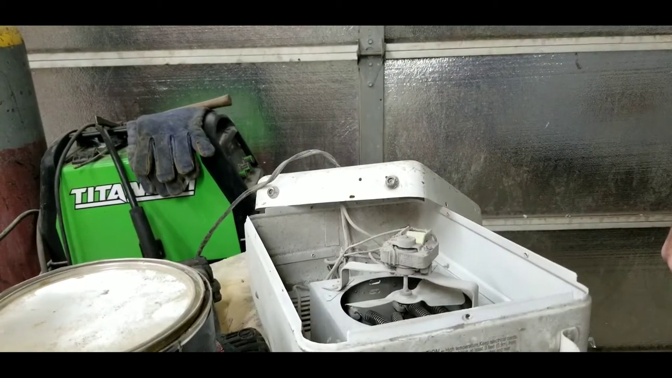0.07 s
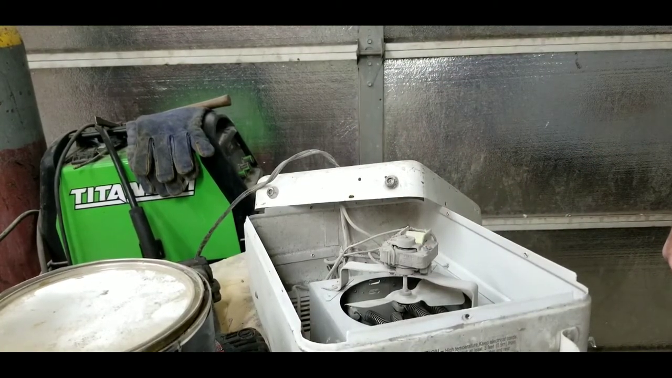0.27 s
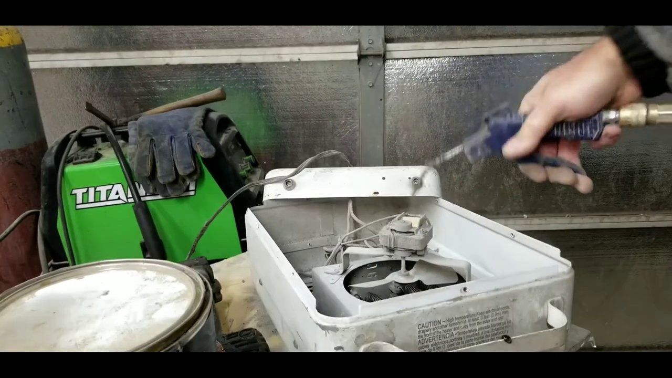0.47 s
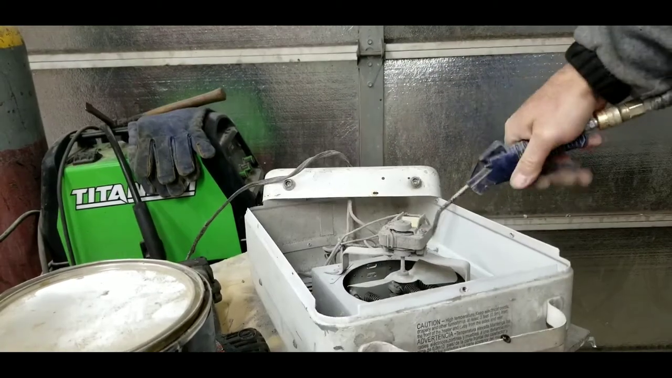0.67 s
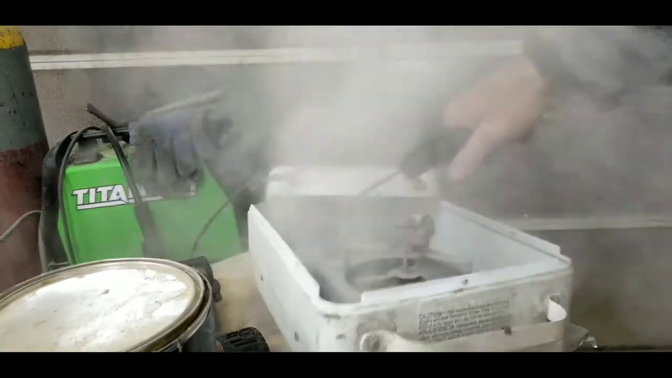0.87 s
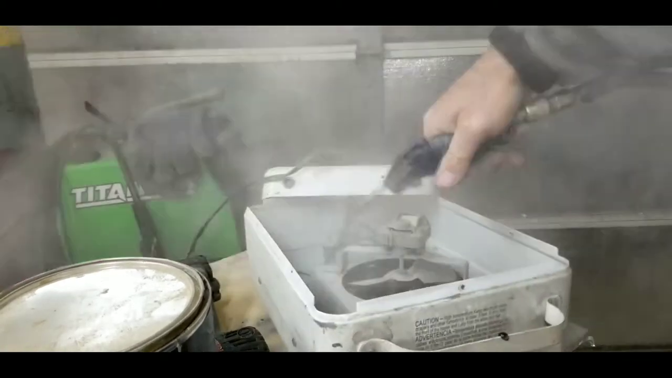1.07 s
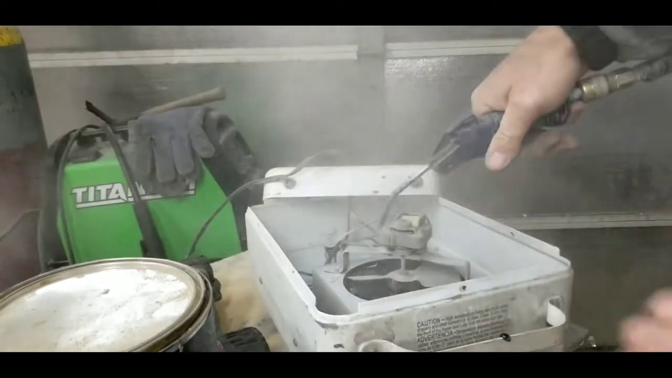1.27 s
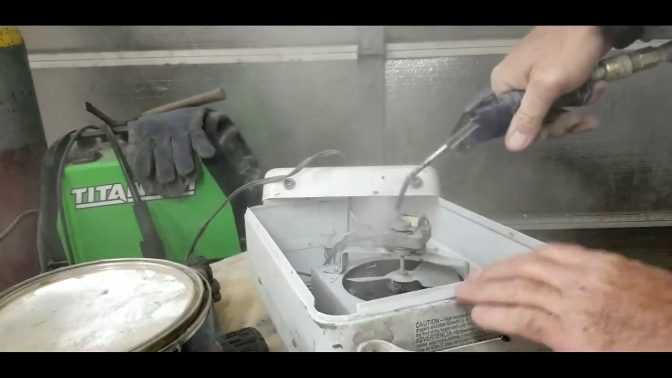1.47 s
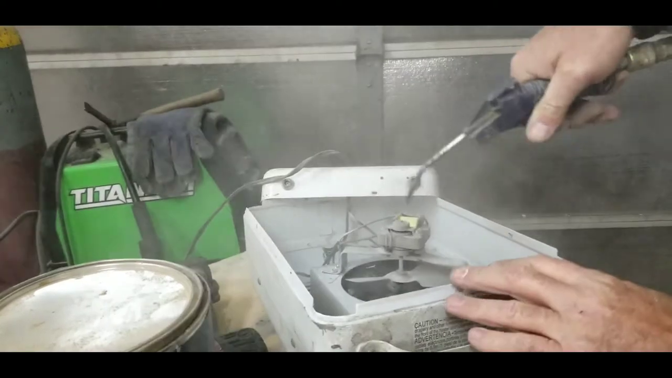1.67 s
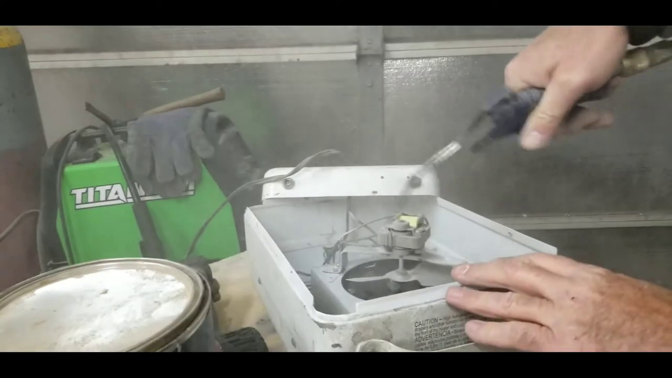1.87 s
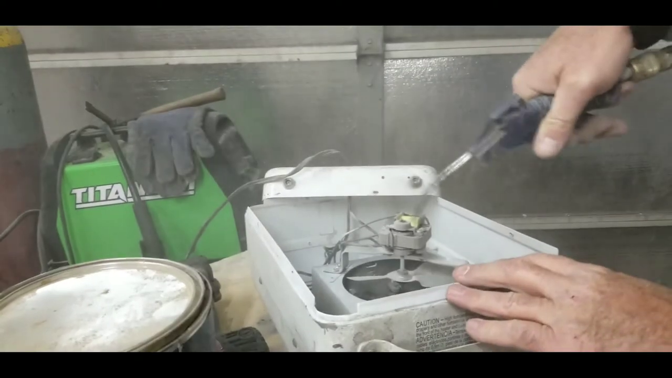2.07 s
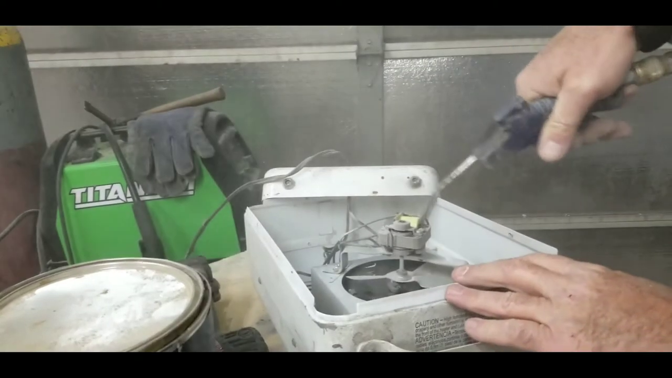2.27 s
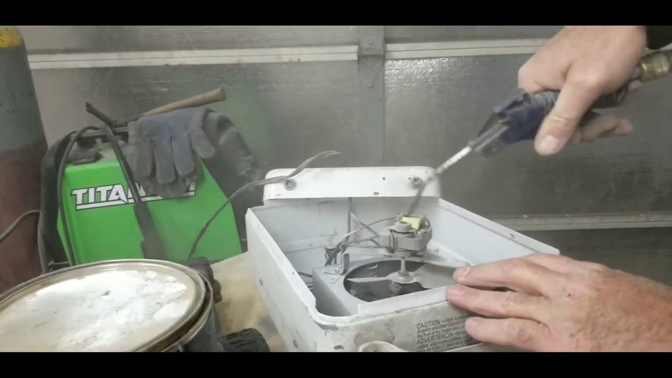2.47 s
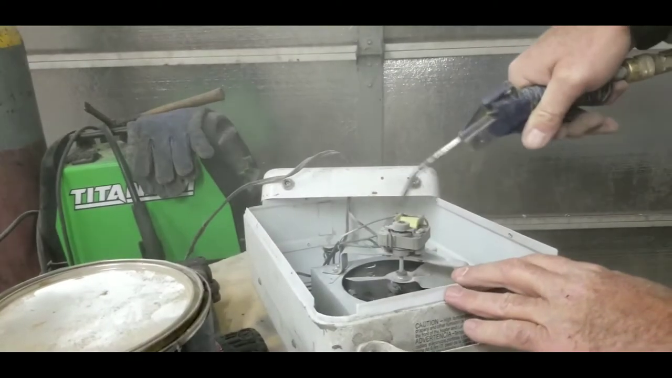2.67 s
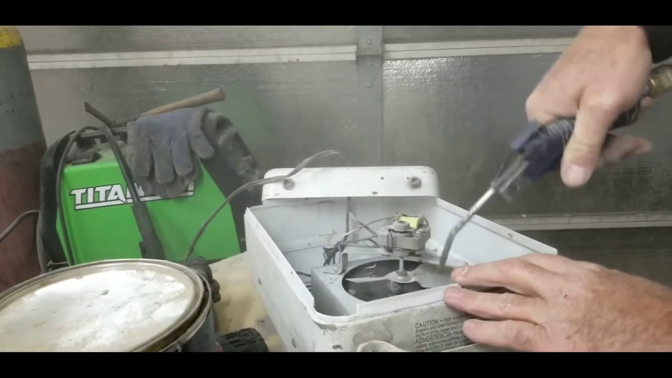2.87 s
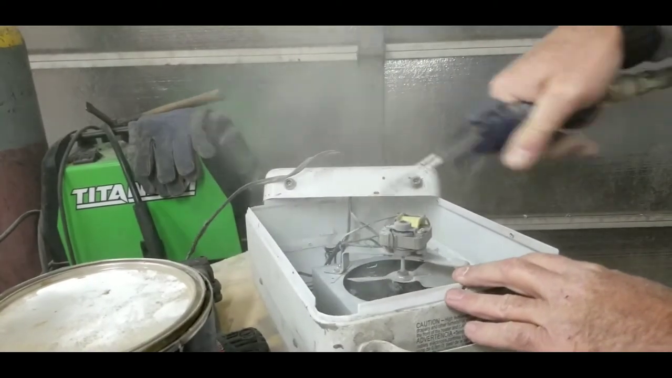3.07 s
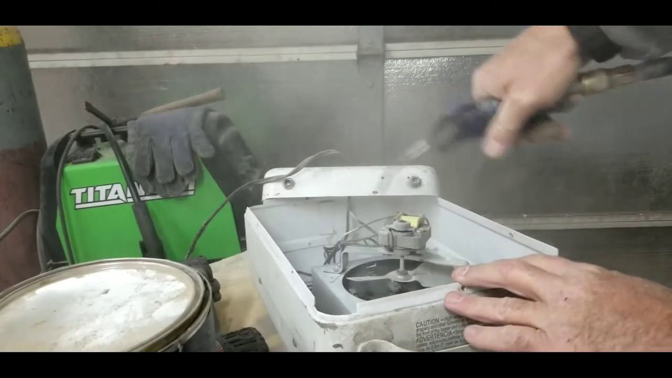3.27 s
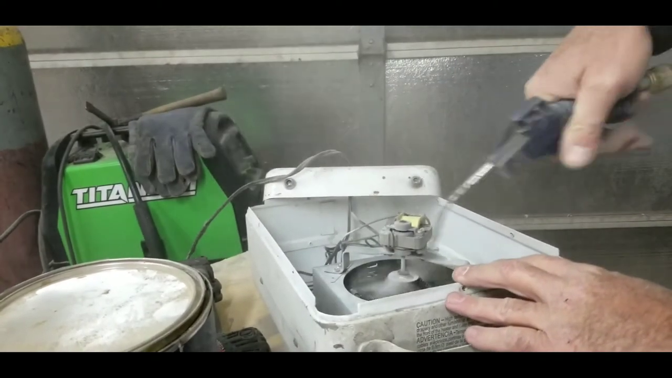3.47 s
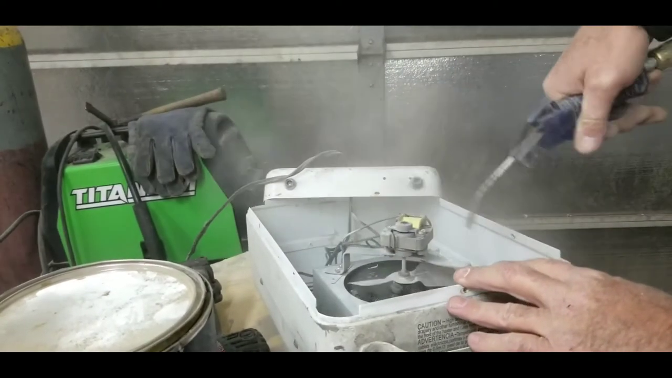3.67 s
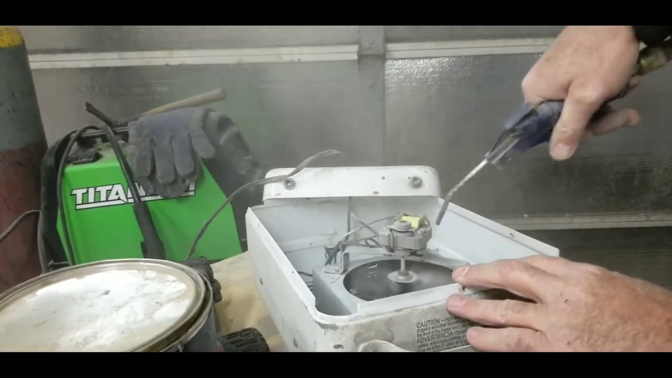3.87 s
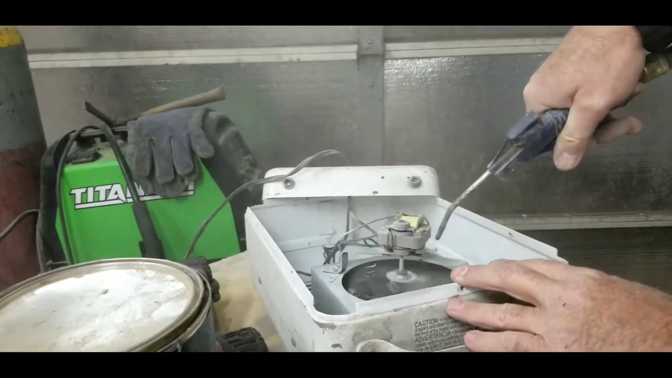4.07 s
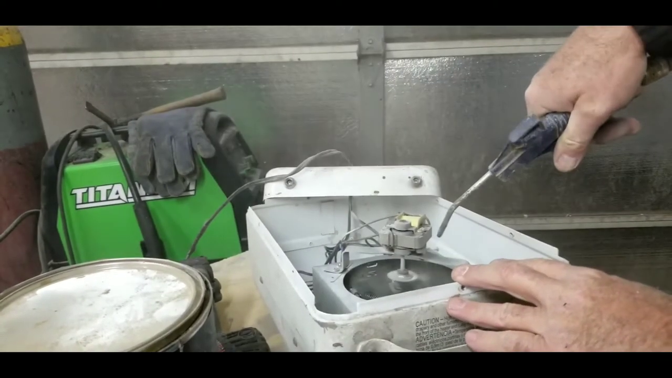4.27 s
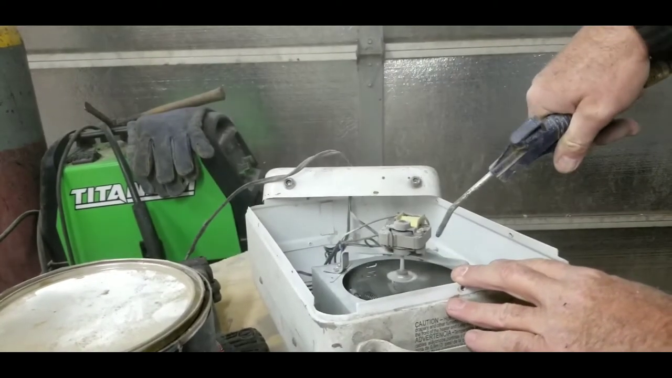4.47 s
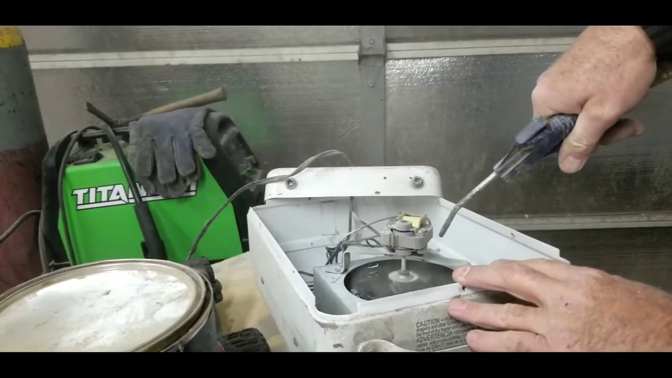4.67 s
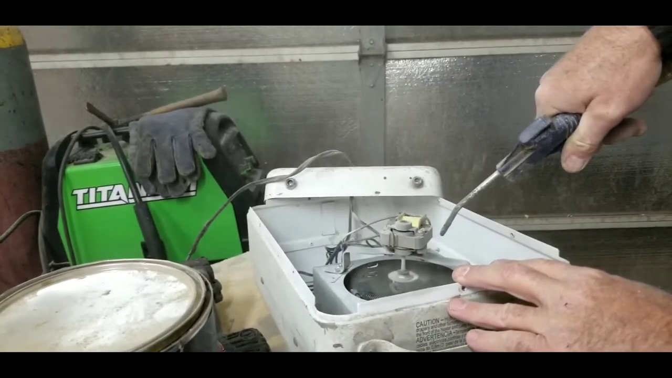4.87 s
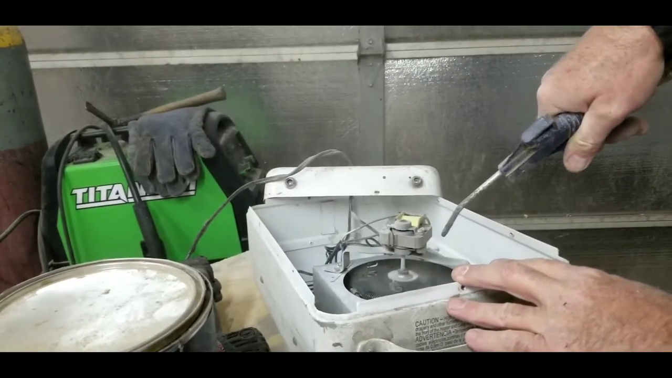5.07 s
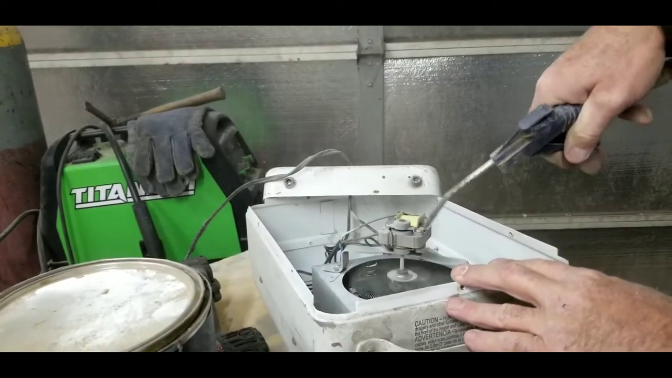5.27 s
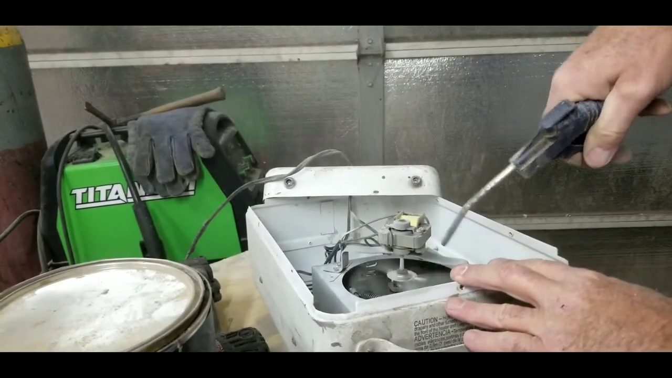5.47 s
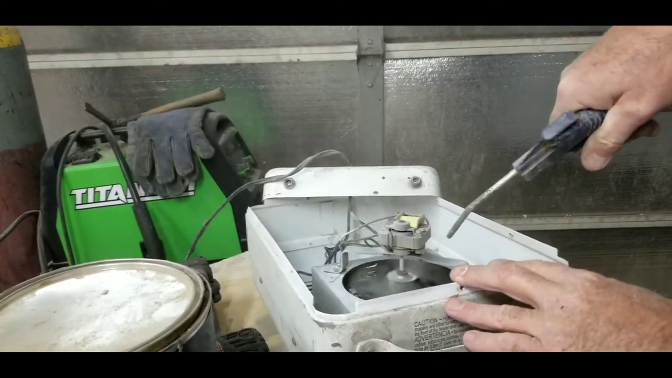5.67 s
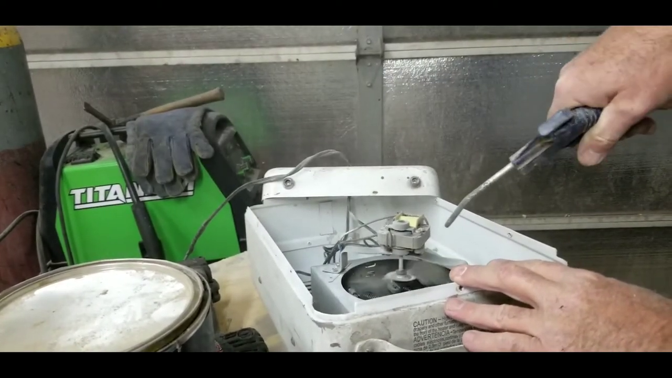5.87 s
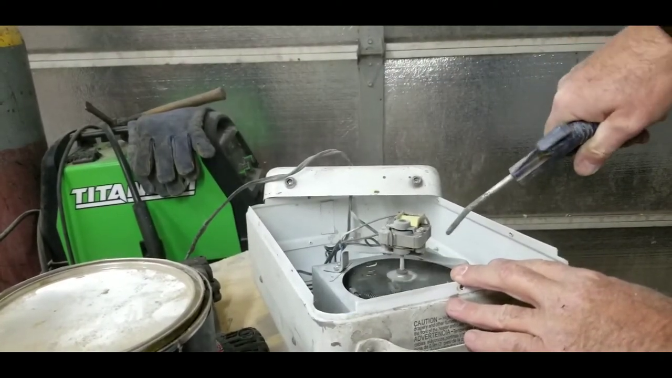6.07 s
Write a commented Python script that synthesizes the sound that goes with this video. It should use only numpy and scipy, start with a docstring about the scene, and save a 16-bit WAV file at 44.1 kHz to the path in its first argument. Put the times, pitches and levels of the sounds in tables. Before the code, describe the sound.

Close stereo microphones in a garage pick up a blow gun cleaning a metal fan heater. A soft rustle leads into a long blast of hissing air that shifts and roars hollowly as it sweeps the casing. Late in the blast the fan whines upward like a small siren. During a short pause the coasting fan chirps faintly; then the hiss returns and the whine climbs once more.

```python
"""In a garage, stereo microphones close to an open sheet-metal fan heater being cleaned with compressed air.
A low rumble, then sleeve and hose swish as the blow gun comes in. The first long burst opens with a whoomp;
the jet hisses, splashes off parts and roars in the casing, and the lance bumps the casing once. Near 4 s
the jet catches the fan, which spins up and chops the air like a siren. The air stops, the casing rings on
and the coasting fan's dry bearing chirps. At 5.5 s a second burst begins and soon catches the fan again."""
import sys
import numpy as np
from scipy import signal
from scipy.fft import rfft, irfft, next_fast_len
from scipy.io import wavfile
from scipy.ndimage import uniform_filter1d, map_coordinates

SR = 44100
rng = np.random.default_rng(int(sys.argv[2]) if len(sys.argv) > 2 else 0)


def unload_audio(sound):
    """Save the sound as a 16-bit wav file, at the path given as the first command line argument."""
    columns = np.transpose(np.atleast_2d(sound))
    # keep every value between -1 and 1, then stretch to whole-number steps
    steps = np.round(np.clip(columns, -1, 1) * 32767)
    wavfile.write(sys.argv[1], SR, steps.astype(np.int16))


N = 270333

# trigger held: opens t/s, closes t/s
BURSTS = [(0.666, 5.15), (5.494, 6.3)]
# slow drift of the aim between parts: t/s, hiss level/dB, splash level/dB, roar level/dB
AIM_DRIFT = [(0.7, -40, -52, -64), (1.15, -48, -55.5, -69), (1.65, -47, -60.5, -74), (2.3, -46.5, -61, -71),
             (2.9, -42.5, -52.5, -64.5), (3.15, -43, -51.5, -54.5), (3.62, -43.5, -48.5, -63.5),
             (3.8, -42.5, -55, -66), (4.0, -40.5, -48.5, -57), (4.55, -40.5, -46, -53),
             (5.14, -39.5, -48, -58.5), (5.5, -38.5, -52, -61.5), (5.75, -38, -55, -58.5),
             (5.96, -43, -53, -57), (6.1, -40.5, -52, -57)]
# the jet sweeps over a part: start t/s, length/s, hiss level/dB, splash level/dB, roar level/dB
SWEEPS = [(0.668, 0.15, -42, -45, -57), (0.753, 0.054, -44, -44.5, -53.5), (0.855, 0.16, -40, -43.5, -52),
          (1.082, 0.075, -45, -45.5, -52.5), (1.243, 0.15, -45, -43, -63), (1.404, 0.076, -50, -48, -58.5),
          (1.516, 0.021, -45, -49, -60), (1.544, 0.044, -48, -51.5, -59.5),
          (1.632, 0.06, -42.5, -53.5, -57.5), (1.735, .07, -46.5, -57.5, -70),
          (1.766, 0.023, -46, -43.5, -50.5), (1.875, 0.03, -43, -39, -50.5),
          (1.985, 0.044, -44, -39.5, -50), (2.095, 0.036, -41.5, -38.5, -52.5),
          (2.206, 0.039, -43.5, -39.5, -52), (2.307, 0.056, -53, -48.5, -52.5),
          (2.404, 0.073, -38.5, -46, -60.5), (2.49, 0.089, -44.5, -57, -59.5),
          (2.625, 0.038, -48, -35.5, -48), (2.706, 0.014, -43, -62, -57), (2.752, 0.027, -41, -44.5, -48.5),
          (2.803, 0.097, -42, -46.5, -63), (2.933, 0.14, -50, -45, -59), (3.176, 0.068, -60, -42.5, -50),
          (3.3, .07, -44.5, -48.5, -58), (3.393, 0.068, -49, -44, -52), (3.463, 0.065, -45, -47, -57.5),
          (3.685, 0.074, -40, -44, -56), (3.834, .105, -41.5, -44, -56.5), (5.505, .13, -52, -45, -64),
          (5.789, 0.038, -51, -59, -54), (5.839, 0.067, -42, -45.5, -51.5), (5.98, 0.14, -44.5, -44, -51)]
# resonance of the hollow that the jet blows into: t/s, f/Hz
HOLLOW_RESONANCE = [(1.15, 3470), (1.42, 4800), (1.75, 3620), (2.1, 4930), (2.25, 3550), (2.45, 5130),
                    (2.65, 3360), (2.9, 5670), (3.1, 3060), (3.45, 3850), (3.75, 5000), (6.1, 4500)]
# colours of the air at the nozzle, on surfaces and in the casing: f/Hz, relative level/dB
HISS_COLOUR = [(100, -69), (300, -18), (1000, -17), (2000, -13.5), (4000, -9), (7000, -0.5), (8300, -5),
               (9600, 2), (10500, 0.5), (12000, 2.5), (13200, 1), (15500, -0.5)]
SPLASH_COLOUR = [(400, -61), (1000, -20.5), (2000, -2.5), (3000, -0.5), (3800, -0.5), (5200, 1),
                 (6600, -0.5), (8200, -6.5), (11000, -5.5), (15500, -17)]
ROAR_COLOUR = [(300, -36), (650, -16), (900, -4.5), (1120, 2), (1500, -5), (2000, -5.5), (3500, -13),
               (8000, -19)]
DRAUGHT_COLOUR = [(25, -32), (90, -16), (170, -10.5), (330, -4.5), (520, 3.5), (750, 1.5), (1300, -4),
                  (4000, -48)]
PUFF_COLOUR = [(20, -20), (140, -1), (260, 1.0), (600, -28)]
# how fully the jet rests on the fan: t/s, share 0-1
ON_FAN = [(3.9, 0), (4.2, 1), (5.2, 1), (5.4, 0), (5.95, 0), (6.1, 1)]
# the jet drives the fan: start t/s, end t/s
FAN_DRIVES = [(3.96, 5.108), (5.95, 6.3)]
# rate at which the blades pass: t/s, f/Hz
BLADE_RATE = [(3.95, 98), (4.05, 115.8), (4.116, 136.5), (4.186, 155), (4.23, 164), (4.344, 180.1),
              (4.44, 188.9), (4.528, 192.5), (4.654, 196.1), (4.78, 196.5), (4.93, 193.7), (5.1, 195.3),
              (5.92, 100), (6.13, 161.6)]
# response of the casing to the blade pulses: f/Hz, gain/dB
CASING_RESPONSE = [(110, -20), (195, -18), (285, -0.5), (345, -10.5), (372, -6), (389, 1.5), (430, 1.5),
                   (515, 6), (575, -7), (650, 4.5), (785, -4), (880, 2.5), (955, 8), (990, -2), (1060, -12),
                   (1122, 7), (1165, -9), (1320, -0.5), (1400, -16), (1510, -1), (1600, -12.5), (4000, -20)]
# response of the motor frame to the bearing: f/Hz, gain/dB
FRAME_RESPONSE = [(850, 0.5), (1150, -7), (1600, -11), (2400, -15), (3200, 2), (3700, -1), (4300, -19),
                  (6300, -6), (8500, -24)]
# handling before the first burst: t/s, rumble level/dB, rustle level/dB
HANDLING_LEVELS = [(0, -71.5, -79), (0.14, -71, -79), (0.2, -62, -69.5), (0.28, -63.5, -78.5),
                   (0.335, -65.5, -74), (0.355, -120, -120)]
# colours of the handling and the noise floor: f/Hz, relative level/dB
RUMBLE_SPECTRUM = [(20, -6), (45, -4.5), (70, -2), (105, -2), (160, -17), (300, -28), (800, -27),
                   (2000, -64)]
SWISH_SPECTRUM = [(59, -30), (100, -14), (156, -7), (347, -17), (627, -11), (682, -9.5), (1490, -6.5),
                  (4560, -8), (15500, -14.5)]
RUSTLE_SPECTRUM = [(200, -7), (2500, -7.0), (8000, -7.5), (15000, -8.0)]
FLOOR_SPECTRUM = [(50, 0), (500, -6), (15000, -22)]
# reverberation of the garage: f/Hz, T60/s
GARAGE_DECAY = [(150, 0.82), (400, 0.77), (1000, 0.39), (4000, 0.51), (9000, 0.44), (15000, 0.25)]
# likeness of the noise at the two microphones: f/Hz, correlation
MIC_CORRELATION = [(60, 0.87), (300, 0.4), (1000, 0.58), (2400, 0.49), (3600, 0.61), (5000, 0.3),
                   (6700, 0.028), (8300, -0.15), (9700, 0.072), (10900, 0.04), (12500, 0.16), (15000, .15)]
# balance of the microphones: f/Hz, left minus right level/dB
MIC_BALANCE = [(200, -1.4), (1000, -0.4), (3500, 0.7), (8100, -2.5), (15000, -0.3)]


def jet(blade_phase):
    """The turbulent jet hisses at the nozzle, splashes on parts and roars in the casing over a draught."""
    hiss_db, splash_db, roar_db = aim()
    on_fan, = curves(ON_FAN)
    draught_db = -66 + 0.45 * (roar_db - roar_db.mean()) + 2 * on_fan
    # the jet flutters on small parts; held on the fan it is steadier and the blades chop it
    unsteady = 1 - 0.48 * on_fan
    flutter_db = 1.4 * unsteady * wobble(50)
    buffet_db = lambda: 2.5 * unsteady * wobble(40)
    chop = 1 + 0.2 * on_fan * np.cos(blade_phase)
    hiss = amp(hiss_db + flutter_db) * rush(HISS_COLOUR, patchy_db=2.0)
    splash = amp(splash_db + flutter_db) * rush(SPLASH_COLOUR, patchy_db=1.92, shape=hollow)
    roar = amp(roar_db + flutter_db + buffet_db()) * rush(ROAR_COLOUR, patchy_db=1)
    draught = amp(draught_db + buffet_db()) * rush(DRAUGHT_COLOUR, patchy_db=1.96)
    return (hiss + chop * (splash + roar + draught)) * valve()


def aim(attack_s=.01, release_s=.013):
    """Hiss, splash and roar in dB: each part that the jet sweeps over adds its power to the free jet."""
    t, power = clock(), amp(curves(AIM_DRIFT)) ** 2
    for start, length, *levels_db in SWEEPS:
        end = start + length
        corners = [start - attack_s / 2, start + attack_s / 2, end - release_s / 2, end + release_s]
        span = slice(*np.searchsorted(t, [corners[0], corners[-1]]))
        on_part = np.interp(t[span], np.sort(corners), [0, 1, 1, 0])
        power[:, span] += np.outer(amp(levels_db), on_part) ** 2
    return 10 * np.log10(power)


def hollow(hz, t, boost_db=2.0, octaves=0.52):
    """A broad resonance that moves with the aim of the jet, in dB."""
    centre_hz = np.interp(t, *np.transpose(HOLLOW_RESONANCE))
    return boost_db * np.exp(-(np.log2((hz + 1) / centre_hz) / octaves) ** 2)


def valve(opening_s=0.013, emptying_s=0.0067):
    """Air flow 0-1: the valve opens fast and the lance empties after it shuts."""
    return sum(gate(opens, closes, opening_s, emptying_s) for opens, closes in BURSTS)


def puff(decay_s=0.17):
    """The first blast shoves the still air out of the casing with a low whoomp."""
    age = clock() - BURSTS[0][0]
    push = amp(-63.0) * (age > 0) * np.exp(-np.abs(age) / decay_s)
    return push * rush(PUFF_COLOUR, patchy_db=2)


def fan(blade_phase, full_speed_hz=200.3, db_per_decade=63):
    """Each blade cuts the jet once: pulses whose harmonics glide through the casing's resonances."""
    blade_hz, = curves(BLADE_RATE)
    tone = amp(-28.5) * np.cos(blade_phase / 2)  # unequal blades add a tone at half the blade rate
    for k in range(1, 17):
        gain = amp(along(CASING_RESPONSE, k * blade_hz))
        smear = rng.normal(0, np.sqrt(k) / 2)  # echoes inside the casing spread each pulse
        tone += gain * amp(wobble(7)) * np.cos(k * blade_phase + smear)
    uneven = 1 + 0.14 * wobble(150)  # no two blades get the same push
    driven = sum(gate(start, end, attack_s=0.061, release_s=0.0081) for start, end in FAN_DRIVES)
    whine_db = -54 + db_per_decade * np.log10(blade_hz / full_speed_hz)
    return np.sqrt(2) * amp(whine_db) * uneven * tone * driven


def blades():
    """Phase of the blade passes, slightly unsteady."""
    blade_hz, = curves(BLADE_RATE)
    return phase_of(blade_hz * (1 + .002 * wobble(60)))


def casing_ring(siren, mode_hz=384.5, t60_s=1.6):
    """One long-lived mode of the sheet-metal casing rings on after the siren."""
    width_hz = np.log(1000) / (np.pi * t60_s)
    mode = lambda hz: 1j * hz * width_hz / (mode_hz ** 2 - hz ** 2 + 1j * hz * width_hz)
    return amp(-15) * filtered(siren, mode)


def bearing(start_s=5.14, length_s=.35, start_hz=1240, sag_hz=492, db_per_decade=44):
    """The dry bearing chirps, sinking as it slows; the frame picks out one overtone after another."""
    progress = np.clip((clock() - start_s) / length_s, 0, 1)
    pitch_hz = start_hz - sag_hz * progress ** 2.9
    level_db = -68 + db_per_decade * np.log10(pitch_hz / start_hz)
    shaft_phase = phase_of(pitch_hz * .033)
    jitter = .055 * np.sin(shaft_phase) + .04 * wobble(700)
    phase = phase_of(pitch_hz * (1 + jitter))
    # it rubs on one side of each turn, never twice alike
    spurts = lambda: amp(3.5 * wobble(55) + 7 * np.sin(shaft_phase))
    chirp = sum(amp(along(FRAME_RESPONSE, k * pitch_hz)) * spurts() * np.sin(k * phase)
                for k in range(1, 9))
    scrape = rush(SPLASH_COLOUR, patchy_db=4) + amp(-10) * rush(HISS_COLOUR, patchy_db=3)
    coasting = gate(start_s, start_s + length_s, attack_s=.04, release_s=.01)
    return amp(level_db) * (unit(chirp) + amp(-0.8) * scrape) * coasting


def knock(at_s=1.514, t60_s=.11):
    """The lance bumps the casing once and stirs its low resonances."""
    bump = gate(at_s, at_s, attack_s=.002, release_s=t60_s / np.log(1000))
    return amp(-55) * bump * rush(DRAUGHT_COLOUR, patchy_db=1)


def handling(swish_start_s=0.466, peak_s=0.58, width_s=.068):
    """A low rumble and faint rustle stop dead; then sleeve and hose swish as the gun is brought in."""
    rumble_db, rustle_db = curves(HANDLING_LEVELS)
    rumble = amp(rumble_db) * rush(RUMBLE_SPECTRUM, patchy_db=0.0)
    rustle = amp(rustle_db) * rush(RUSTLE_SPECTRUM, patchy_db=2.0)
    swell = amp(-60.5) * np.exp(-((clock() - peak_s) / width_s) ** 2)
    moving = gate(swish_start_s, BURSTS[0][0], attack_s=.002, release_s=.01)
    swish = np.maximum(swell, amp(-77)) * moving * rush(SWISH_SPECTRUM, patchy_db=1.5)
    return rumble + rustle + swish


def garage(sound):
    """The hard walls answer 5 ms behind the direct sound; each frequency dies at its own speed."""
    hz, t, spectra = signal.stft(rng.standard_normal((2, SR * 3 // 4)), SR, nperseg=256)
    decay = amp(-60 * t / along(GARAGE_DECAY, hz)[:, None])
    tail = signal.istft(spectra * decay, SR, nperseg=256)[1]
    tail = np.pad(tail / np.linalg.norm(tail[0]), ((0, 0), (SR // 200, 0)))
    return signal.fftconvolve(sound, tail, axes=1)[:, :N]


def rush(colour, patchy_db, shape=None):
    """Stereo turbulence whose colour drifts in patches; shape(Hz, s) adds dB; its mid has rms 1."""
    hz, t, spectra = signal.stft(rng.standard_normal((2, N)), SR, nperseg=512)
    patches = rng.standard_normal(spectra.shape[1:])
    patches = uniform_filter1d(uniform_filter1d(patches, size=6, axis=0), size=26, axis=1)
    moving_db = shape(hz[:, None], t) if shape else 0
    pair = signal.istft(spectra * amp(patchy_db * unit(patches) + moving_db), nperseg=512)[1][:, :N]

    def mid_side_gains(hz):
        spread = np.arccos(np.clip(along(MIC_CORRELATION, hz), -1, 1)) / 2
        return amp(along(colour, hz)) * [np.cos(spread), np.sin(spread)]

    mid, side = filtered(pair, mid_side_gains)
    return np.array([mid + side, mid - side]) / np.std(mid)


def wobble(rate):
    """A smooth random curve, rate knots a second."""
    knots = rng.standard_normal(int(N * rate / SR) + 4)
    fine = np.arange(0, len(knots) - 1, .125)
    return np.interp(clock() * rate, fine, map_coordinates(knots, [fine]))


def gate(start, end, attack_s, release_s):
    """0-1: a straight rise at the start, a hold, and an exponential fall after the end."""
    t = clock()
    return np.clip((t - start) / attack_s, 0, 1) * np.exp(-np.maximum(t - end, 0) / release_s)


def filtered(x, response):
    """Filter x by a response of frequency."""
    size = next_fast_len(N + SR // 4)
    return irfft(rfft(x, size) * response(np.fft.rfftfreq(size, 1 / SR)), size)[..., :N]


def along(points, hz):
    """Read (f/Hz, value) points on a log axis."""
    point_hz, values = np.transpose(points)
    return np.interp(np.log(hz + 1), np.log(point_hz + 1), values)


def curves(rows):
    """One value per sample for each column after the time."""
    times, *columns = np.transpose(rows)
    return [np.interp(clock(), times, column) for column in columns]


def phase_of(hz):
    """Running phase of a changing frequency, in radians."""
    return 2 * np.pi * np.cumsum(hz) / SR


def amp(db):
    """Decibels to gain."""
    return 10 ** (np.asarray(db) / 20)


def unit(x):
    """Scale to rms 1."""
    return x / np.sqrt(np.mean(x ** 2) + 1e-20)


def clock():
    """The time of every sample."""
    return np.arange(N) / SR


def scene():
    """The heater close up with its fan in the centre, the garage around it, a very quiet noise floor."""
    blade_phase = blades()
    close_noise = jet(blade_phase) + puff() + bearing() + knock()
    siren = np.array([fan(blade_phase)] * 2)
    walls = garage(amp(-10.5) * close_noise + amp(-18) * siren)
    floor = amp(-101) * rush(FLOOR_SPECTRUM, patchy_db=2)
    return close_noise + siren + casing_ring(siren) + walls + handling() + floor


def record(dry, top_hz=15650):
    """The microphone pair leans slightly to the right and cuts off steeply at its band limit."""
    balance = lambda hz: amp(np.outer([.5, -.5], along(MIC_BALANCE, hz)))
    band = lambda hz: np.clip((top_hz - hz) / 300 + .5, 0, 1) ** 2
    return filtered(dry, lambda hz: balance(hz) * band(hz))


dry = scene()
out = record(dry)
unload_audio(out)
```